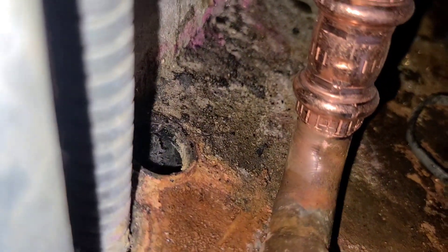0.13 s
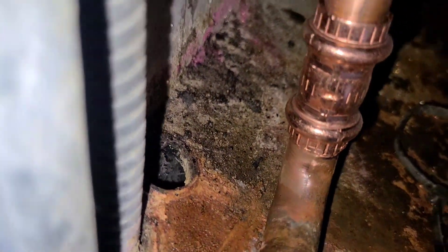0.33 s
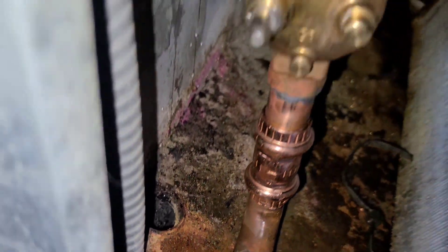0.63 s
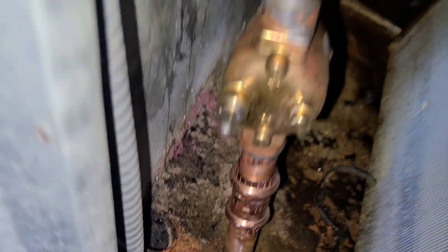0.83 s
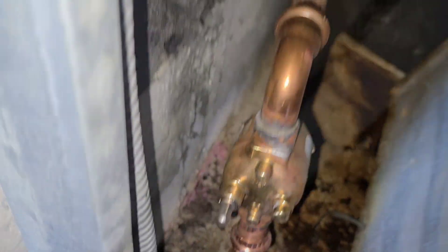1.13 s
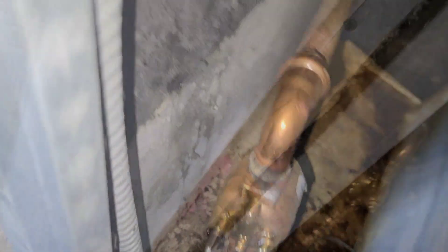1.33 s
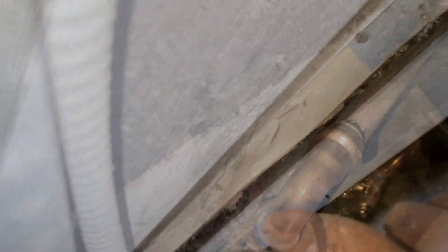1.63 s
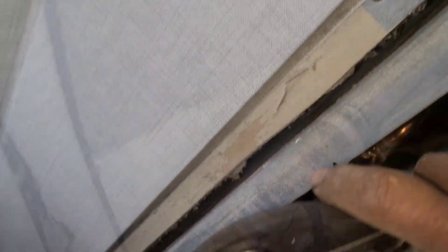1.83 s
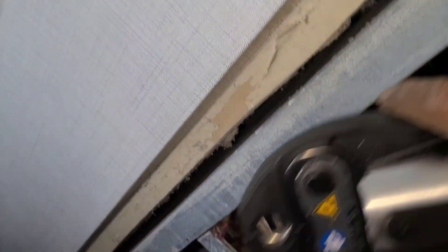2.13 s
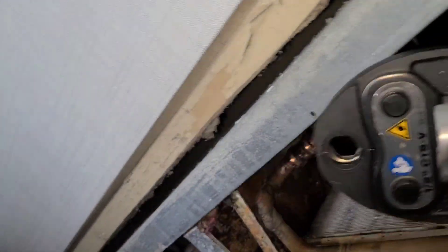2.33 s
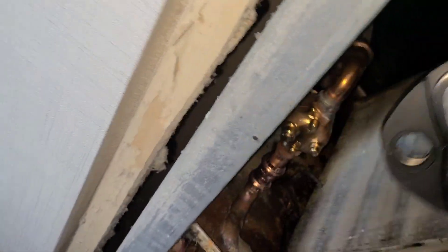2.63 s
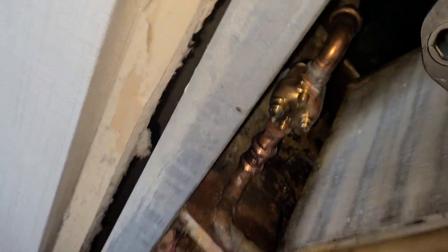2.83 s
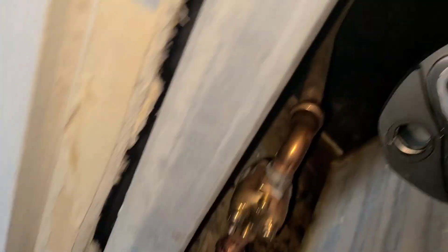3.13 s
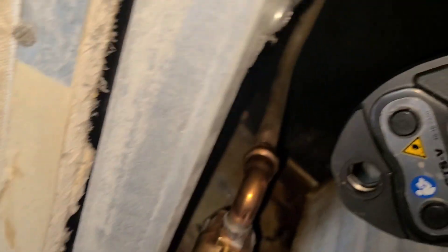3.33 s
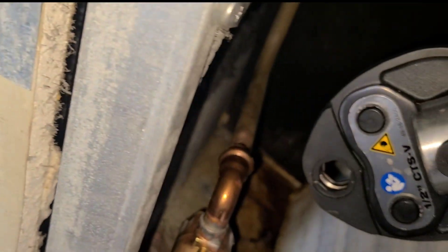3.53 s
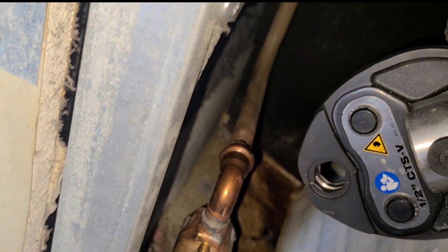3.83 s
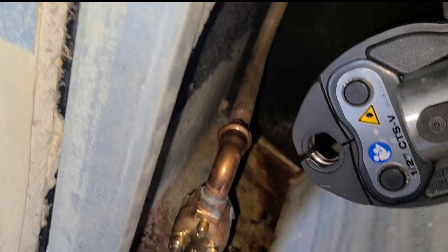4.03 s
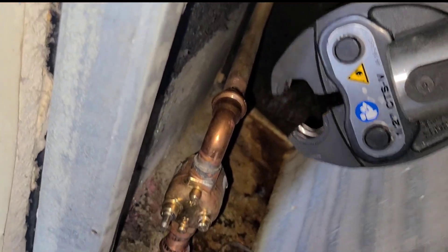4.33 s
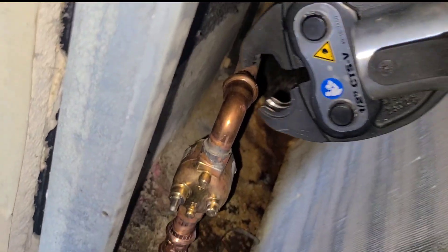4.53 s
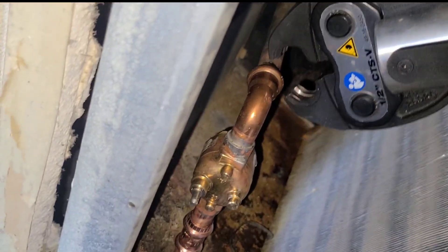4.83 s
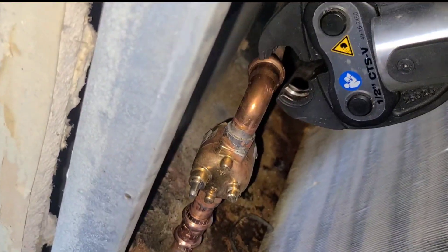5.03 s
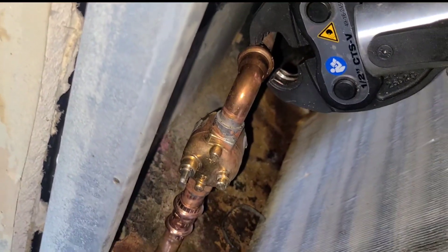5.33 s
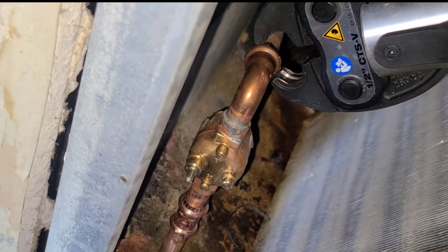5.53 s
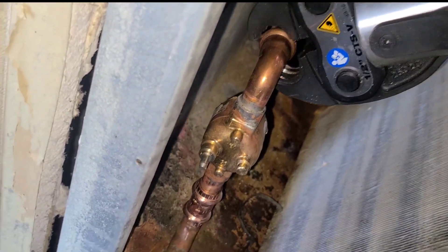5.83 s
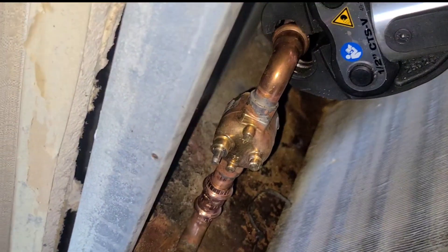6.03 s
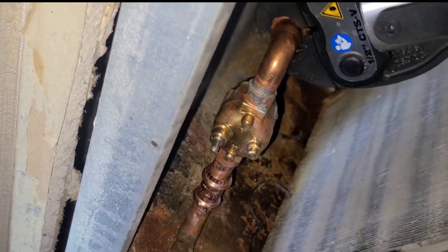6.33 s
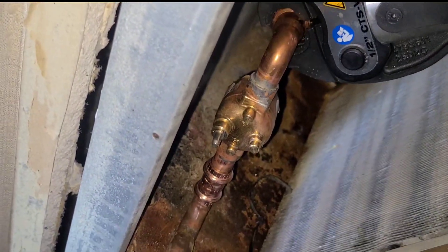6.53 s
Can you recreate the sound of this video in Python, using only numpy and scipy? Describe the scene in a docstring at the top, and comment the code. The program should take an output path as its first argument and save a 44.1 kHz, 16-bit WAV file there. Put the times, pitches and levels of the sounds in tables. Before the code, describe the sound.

Close clunks, metallic rattles and dry snaps of a heavy hand tool being manoeuvred against framing and copper pipe, with hollow thuds and quiet gaps.

```python
"""In a narrow wall cavity, in a quiet room with a low rumble, a heavy press tool is set on a copper fitting.
Its steel jaws click; it knocks on framing and pipe, scrapes along an edge and sets a hollow panel booming.
Knocks, scrapes, rumble and hiss are shaped noise; booms and clicks are dying sines; squeaks are wavering sines.
Metal resonances and early echoes colour the knocks and scrapes. Two microphones hear it all in stereo."""
import sys
import numpy as np
from scipy import signal
from scipy.fft import rfft, irfft
from scipy.io import wavfile
from scipy.ndimage import uniform_filter1d

SR = 44100
rng = np.random.default_rng(int(sys.argv[2]) if len(sys.argv) > 2 else 0)


def wav_record(signal):
    """Record a signal, one row per channel, as 16-bit PCM in the file named by sys.argv[1]."""
    frames = np.transpose(np.atleast_2d(signal))
    bounded = np.clip(frames, -1, 1)
    # unit amplitude maps onto the largest positive 16-bit level
    quanta = np.round(bounded * 32767).astype(np.int16)
    wavfile.write(sys.argv[1], SR, quanta)


N = 295470  # length of the sound in samples
HZ = np.fft.rfftfreq(N, 1 / SR)

# Table levels are relative: later filters, echoes and trims still change them.
# Steady sound of the room: (frequency [Hz], level per Hz [dB])
ROOM_SPECTRUM = [(20, -22.5), (32, -2.5), (64, 9), (95, -7.5), (170, -8.5), (230, -29), (400, -21.5),
                 (560, -28.5), (850, -35), (1250, -20.5), (1850, -37.5), (2900, -23), (5200, -35),
                 (6500, -53.5), (11500, -40), (16000, -48)]
ROOM_DB = -55.5

# Brief notes of rubbed or struck metal: (time [s], pitch [Hz], level [dB], length [s])
SQUEAKS = [(0.416, 2830, -58, 0.033), (1.854, 3510, -47, 0.085), (1.88, 440, -67, 0.85),
           (2.455, 508, -39, 0.078), (3.24, 535, -48, 0.14), (4.177, 8950, -63.5, 0.073),
           (5.621, 420, -50.5, 0.22), (6.4, 1510, -32.5, 0.023)]

# Faint swells of hiss: (start [s], length [s], level [dB])
HISS_SWELLS = [(.45, 1, -75.5), (3.527, .06, -63.5), (3.645, 0.096, -74), (3.83, 0.16, -62.5),
               (4.025, 0.37, -77.5)]
# Colour of that hiss: (frequency [Hz], level per Hz [dB])
HISS_SPECTRUM = [(1500, -7), (3500, -1), (6500, -8.5), (11000, -2), (16000, -5.5)]

# Blows. Hard contact is bright, padded contact dull; a loose part after-rings, a part held fast does not:
# (time [s], thud [dB], level [dB], brightness [dB per octave], ring time at 1 kHz [s], after-ring [dB])
KNOCKS = [(1.066, -24, -21, 3, 0.043, -18), (1.115, -30, -34.5, 5, 0.032, -11.5),
          (1.313, -67, -47.5, 4.5, 0.029, -6), (1.416, -43.5, -42.5, -3.5, 0.03, -20),
          (1.637, -63, -51.5, 3.5, 0.036, -10.5), (1.736, -50.5, -53, -7, 0.022, -27),
          (1.853, -65, -50, 2, 0.028, -3), (2.255, -59, -40.5, 1, 0.058, -14.5),
          (2.286, -15.5, -26, -0.5, 0.029, -19.5), (2.325, -22, -51.5, 4, .025, -6.5),
          (2.448, -21.5, -21.5, -2, .055, -19.5), (2.468, -12.5, -20.5, -1.1, 0.048, -22),
          (2.54, -34, -30.5, 2, .044, -11), (2.585, -23, -30, 3, 0.094, -14),
          (2.606, -23, -42.5, -9, 0.07, -20), (2.671, -27, -40, -0.5, .044, -5.5),
          (2.711, -29, -38.5, 5.5, 0.022, -1), (2.762, -23.5, -20.5, 4, 0.027, -20.5),
          (2.813, -46, -35.5, 1, 0.11, -20), (2.868, -31.5, -42.5, 3.5, 0.056, -19),
          (2.911, -63, -20, 5.5, .06, -20), (3.05, -39.5, -47, -2, 0.052, -4),
          (3.1, -63, -27, 4.5, 0.055, -20.5), (3.159, -32, -36.5, 1, 0.088, -21),
          (3.253, -50, -50.5, 5, 0.016, -6), (3.322, -45.5, -50.5, -1.5, 0.13, -12.5),
          (3.566, -57.5, -59.5, -8, .068, -17.5), (4.487, -39, -35.5, 7, 0.055, -20),
          (4.573, -24, -25, 4, 0.038, -26), (4.697, -28, -29, -2.9, 0.13, -17.5),
          (4.793, -25, -24.5, -0.6, 0.04, -15), (4.817, -34, -35, 1.5, 0.11, -28),
          (5.131, -28.5, -35, -1, 0.16, -22), (5.236, -39.5, -51, -5.5, 0.18, -11),
          (5.277, -43, -49, -6, .045, -13), (5.694, -35, -54, -6.5, 0.05, -7),
          (5.902, -35.5, -50.5, -9.5, 0.07, -10.5), (6.061, -52, -68.5, -9.5, 0.16, -11.5),
          (6.261, -41.5, -50, -7.5, 0.069, -9), (6.347, -32.5, -31, 0.5, 0.098, -7.5),
          (6.385, -25, -40.5, -4, 0.065, -3.5), (6.406, -38, -35.5, -4, 0.079, -19)]
# A blow of middling hardness: (frequency [Hz], level [dB])
BLOW_SPECTRUM = [(300, -4), (520, -5), (1000, 1), (1600, 2.5), (2600, 0.5), (4300, 3), (7000, -5.5),
                 (11000, -12), (15000, -16.5)]
PIVOT_HZ = 2500  # brightness tilts a blow around this frequency
# Resonances of steel jaws, pipe and framing: (frequency [Hz], width [Hz], level over the dense modes [dB])
METAL_MODES = [(256, 54, -1), (421.6, 60, 4.5), (706, 28, -1), (904, 26, -4), (1034, 44, -7.5),
               (1183, 37, -3.5), (1720, 32, -11.5), (1747, 9.3, -0.5), (2083, 23, -14), (2690, 22, 5),
               (3476, 310, 3), (3780, 12, -9.5), (4310, 41, -7), (5020, 160, 2.5), (5430, 70, 6.5),
               (5843, 50, -6.5), (6380, 78, -3.5), (6560, 550, -5), (6940, 25, 6.5), (7396, 51, 11.5),
               (10150, 220, -1), (11510, 230, -1.5)]
# Low notes of the hollow panel: (frequency [Hz], level [dB], time to fall 60 dB [s])
PANEL_MODES = [(45.5, -9, 0.39), (94, -11.5, 0.22), (122.6, 12, 0.053), (148.86, -2.5, 0.28),
               (173, 3, 0.12), (240.6, -7.5, 0.18), (278, -14.5, .25)]
# The pipe run swinging in its clips: (frequency [Hz], level [dB], time to fall 60 dB [s])
PIPE_MODES = [(49.5, -13, 0.39), (80.6, -1, 0.091), (104.4, 1, 0.11), (130.6, 1.5, 0.12),
              (157.5, -5.5, 0.27), (191, -7.5, 0.15), (247.5, -9, 0.25), (300.5, -21.5, 0.31)]
ON_PIPE_S = 4.25  # the tool touches the panel until then, the pipe afterwards

# Strokes of the tool along its surroundings:
# (start [s], length [s], shaking [dB], rubbing [dB], grit [dB])
SLIDES = [(1.113, 0.1, -44, -58.5, -55), (1.423, 0.12, -55.5, -66, -71), (1.585, 0.26, -62.5, -62.5, -73),
          (1.853, 0.11, -49, -56.5, -67), (2.316, .05, -47, -70, -59.5), (2.501, 0.061, -36, -50, -46),
          (2.567, 0.38, -27.5, -42, -44), (3.038, 0.078, -41, -56.5, -53.5), (3.148, .09, -35, -55, -63.5),
          (3.912, 0.058, -48.5, -67, -80), (4.294, 0.11, -56, -63.5, -63.5), (4.397, 0.11, -41, -55, -61),
          (4.484, .08, -43.5, -44.5, -52), (4.575, 0.085, -38.5, -51.5, -50.5),
          (4.689, 0.17, -31.5, -45, -56), (5.165, 0.21, -42, -57, -90), (5.644, .4, -44, -64.5, -79),
          (6.355, 0.1, -31.5, -52.5, -62), (6.63, .09, -55, -69, -62)]
SHAKING, RUBBING, GRITTING = 2, 3, 4  # columns of SLIDES
GRIP_S = 0.038  # time a stroke needs to take hold
# how fast each effect dies away once the hand stops pushing
SHAKE_FADE_DB_PER_S, RUB_FADE_DB_PER_S, GRIT_FADE_DB_PER_S = 87.5, 140, 200.5
# Dull part of a scrape: (frequency [Hz], level per Hz [dB])
RUB_SPECTRUM = [(200, -29), (300, 1), (450, 1), (700, 1), (1300, -4), (2200, -16.5), (3200, -20.5),
                (6000, -70.5)]
# Gritty part of a scrape: (frequency [Hz], level per Hz [dB])
GRIT_SPECTRUM = [(1200, -46), (2500, 3.5), (3500, 0), (5000, 1.5), (7000, -9), (8500, -5.5), (12000, -3.5),
                 (16000, -7)]

# Small dry snaps of jaw and linkage, and the sharp crack that opens some blows: # (time [s], level [dB], pitch
# factor [1], strength of the second click against the first [1])
TICKS = [(1.2133, -26.5, 1.115, 2.8), (1.4182, -42.5, 0.4, 1.1), (1.5103, -45, 0.99, 1.1),
         (1.85, -33, 0.83, 2), (2.156, -48.5, 1.19, 0.36), (2.4506, -24, .6, .8),
         (2.5854, -24.5, 0.75, 0.26), (2.981, -34, 1.3, 0.49), (4.3477, -20, 1.05, 1.9),
         (6.678, -38, 1.26, 0.12)]
# Notes inside one click, at pitch factor 1: (frequency [Hz], level [dB], time to fall 60 dB [s])
SNAP_MODES = [(1390, -11.5, 0.02), (2260, -14.5, 0.0091), (3280, 7.5, 0.01), (4280, 27, 0.0055),
              (5700, -2.5, 0.0028), (9100, -32, 0.0018)]
SNAP_AFTER_T60 = 0.03  # time for the faint answer to a snap to fall 60 dB [s]

# Left microphone over right: (frequency [Hz], level [dB])
BALANCE_DB = [(200, 1), (700, 1), (1300, 6), (2400, 5), (4400, 13.5), (7500, 12.5), (10000, 5.5),
              (15000, -0.5)]
# How alike the two microphones hear: (frequency [Hz], likeness [0-1])
SAME = [(100, 1), (300, 0.4), (600, 0.2), (1200, 0.2), (4000, 0), (14000, 0)]
EDGE_HZ = 16100  # the treble ends here


def amp(db):
    """Turns decibels into gain."""
    return 10 ** (np.asarray(db) / 20)


def unit(x):
    """Scales a signal to an average strength (rms) of 1."""
    return x / np.sqrt(np.mean(x ** 2) + 1e-20)


def read(points, hz):
    """Reads a table between its points, along a logarithmic frequency axis."""
    f, value = np.transpose(points)
    return np.interp(np.log(hz + 1), np.log(f), value)


def add(mix, s, sound):
    """Adds a sound to the mix at time s, cut off at the end of the mix."""
    part = mix[..., round(s * SR):][..., :sound.shape[-1]]
    part += sound[..., :part.shape[-1]]


def pair(two):
    """Blends two unrelated signals into left and right spectra: alike in the bass, less so above."""
    a, b = rfft(two)
    same = np.clip(read(SAME, HZ), 0, 1)
    return np.array([a, same * a + np.sqrt(1 - same ** 2) * b])


def coloured(two, spectrum):
    """Makes a stereo sound of rms 1 by filtering two signals with the given spectrum."""
    return unit(irfft(pair(two) * amp(read(spectrum, HZ)), N))


def high_pass(x, hz, order=2):
    """Weakens what lies below hz."""
    return signal.sosfilt(signal.butter(order, hz, "highpass", fs=SR, output="sos"), x)


def ring(modes, t, pitch=1):
    """Adds up sines that each die away at their own speed, as in a struck body."""
    total = 0
    for hz, db, t60 in modes:
        total = total + amp(db - 60 * t / t60) * np.sin(2 * np.pi * hz * pitch * t)
    return total


def room(swell_s=0.54, start_db=-8):
    """Filtered noise: a steady low rumble, and a faint hiss that comes up in the first moments."""
    air = amp(ROOM_DB) * coloured(rng.standard_normal((2, N)), ROOM_SPECTRUM)
    hiss = irfft(rfft(air) * HZ ** 4 / (HZ ** 4 + 250 ** 4), N)  # the part above about 250 Hz
    hiss_gain = amp(np.interp(np.arange(N) / SR, [0, swell_s], [start_db, 0]))
    return air + hiss * (hiss_gain - 1)


def squeaks(unsteady=0.04):
    """Rubbed or struck metal briefly sings: one sine whose pitch wavers at random."""
    out = np.zeros(N)
    for s, hz, db, length in SQUEAKS:
        t = np.arange(round(length * SR)) / SR
        waver = 1 + unsteady * unit(uniform_filter1d(rng.standard_normal(len(t)), 120))
        note = np.sin(2 * np.pi * np.cumsum(hz * waver) / SR)
        swell = np.sin(np.pi * t / length)
        add(out, s, amp(db) * swell * note)
    return out


def hiss_swells():
    """Each swell is a soft hiss of noise that rises and fades."""
    gain = np.zeros(N)
    for s, length, db in HISS_SWELLS:
        add(gain, s, amp(db) * np.sin(np.linspace(0, np.pi, round(length * SR))))
    return gain * coloured(rng.standard_normal((2, N)), HISS_SPECTRUM)


def blow_db(hz, level_db, brightness, reach=0.47):
    """Gives the spectrum of a blow: the hardness of the contact tilts it, the top octaves most."""
    octaves = ((hz / PIVOT_HZ) ** reach - 1) / (reach * np.log(2))
    return level_db + read(BLOW_SPECTRUM, hz) + brightness * octaves


def cavity(x, reach_s=0.008, count=9, echo=0.27):
    """The close walls return a few early echoes, which comb the sound differently at every call."""
    size = x.shape[1]
    hz = np.fft.rfftfreq(size, 1 / SR)
    taps = np.zeros(size)
    delays = (rng.uniform(0.15, 1, count) * reach_s * SR).astype(int)
    taps[delays] = echo * rng.choice([-1, 1], count)
    share = hz / (hz + 500)  # long waves bend round the studs
    combed = 1 + rfft(taps) * share
    evened = np.sqrt(1 + count * (echo * share) ** 2)  # keeps the level about the same
    return irfft(rfft(x) * combed / evened, size)


def knocks(after_t60=0.34, damping=0.32, rise_s=0.002, top_db=-3):
    """Each blow wakes a dense cloud of short modes (bands of noise) and a weaker after-ring of the cavity."""
    centres = np.geomspace(290, 15000, 12)  # band centres [Hz]
    step = np.log(centres[1] / centres[0])
    t, out = np.arange(SR // 2) / SR, np.zeros((2, N))
    white = pair(rng.standard_normal((2, N)))
    clouds = []
    for hz in centres:
        distance = np.clip(np.log((HZ + 1) / hz) / step, -1, 1)
        band = irfft(white * np.cos(np.pi / 2 * distance), N)
        clouds.append(unit(band) / np.sqrt(3))  # three bands to a register
    for s, _, db, brightness, t60, after_db in KNOCKS:
        start = rng.integers(N - len(t))  # a random piece of the noise for each blow
        blow = np.zeros((2, len(t)))
        for hz, cloud in zip(centres, clouds):
            life = (hz / 1000) ** -damping  # treble dies sooner and rises faster
            direct = amp(-60 * t / (t60 * life))
            after = amp(after_db - 60 * t / (after_t60 * life))
            fall = np.sqrt(direct ** 2 + after ** 2)
            swell = 1 - np.exp(-t / (rise_s * life))
            gain = amp(blow_db(hz, db, brightness) + top_db * (hz / EDGE_HZ) ** 2)
            blow += gain * fall * swell * cloud[:, start:start + len(t)]
        add(out, s, cavity(blow))
    return out


def metal(x):
    """Whatever is struck or scraped rings with the same resonances."""
    body = 1 + sum(amp(db) / (1 + 2j * (HZ - hz) / width) for hz, width, db in METAL_MODES)
    return irfft(rfft(x) * body, N)


def slide(column, fade_db_per_s):
    """Gain for one effect of the strokes: each takes hold, stays even, then dies away."""
    gain = np.zeros(N)
    for row in SLIDES:
        start, length = row[:2]
        t = np.arange(round((length + 1) * SR)) / SR
        grip = np.minimum(t / GRIP_S, 1)
        add(gain, start, grip * amp(row[column] - fade_db_per_s * np.maximum(t - length, 0)))
    return gain


def booming(modes, touching, thud_db, shake_db, spread_s, push_s=0.00063, late_s=0.0021, lowest_hz=38):
    """Blows and the judder of sliding drive the low modes of whatever the tool is touching."""
    t = np.arange(SR) / SR
    filling = 1 - np.exp(-t / spread_s)  # the bending wave takes a moment to spread
    push = t * np.exp(-t / push_s)
    boom = high_pass(signal.fftconvolve(ring(modes, t) * filling, push)[:SR], lowest_hz)
    boom /= np.sqrt(np.mean(boom[:SR // 25] ** 2))  # rms 1 over the first 40 ms
    thuds = np.zeros(N)
    for s, db, *_ in KNOCKS:
        if touching[round(s * SR)]:
            add(thuds, s + late_s, amp(db + thud_db) * boom)
    judder = signal.fftconvolve(rng.standard_normal(N), boom)[:N]
    judder /= np.sqrt(uniform_filter1d(judder ** 2, SR // 10))  # the hand keeps the shaking even
    return thuds + amp(shake_db) * slide(SHAKING, SHAKE_FADE_DB_PER_S) * touching * judder


def scrape(catches_per_s=400, spread_db=4.5, smooth=0.4, flutter_db=2, catch_s=0.0025, shifts_per_s=4):
    """Metal drags over a rough edge: a hail of tiny catches under an unsteady pressure."""
    caught = rng.random(N) < catches_per_s / SR
    size = amp(spread_db * np.minimum(rng.exponential(1, N), 4)) * caught
    power = signal.lfilter([1], [1, -np.exp(-1 / (catch_s * SR))], size ** 2)  # each catch buzzes briefly
    catches = (unit(np.sqrt(power)) + smooth) * rng.standard_normal((2, N))
    flutter = uniform_filter1d(uniform_filter1d(rng.standard_normal(N), 500), 300)
    pressure = amp(flutter_db * unit(flutter))
    rub = slide(RUBBING, RUB_FADE_DB_PER_S) * coloured(catches, RUB_SPECTRUM)
    grit = slide(GRITTING, GRIT_FADE_DB_PER_S) * coloured(catches, GRIT_SPECTRUM)
    sound = unit(pressure) * (rub + grit)
    place = np.sin(np.pi * shifts_per_s * np.arange(N) / SR) ** 2  # the echoes shift as the tool moves
    return cavity(sound * place) + cavity(sound * (1 - place))


def ticks(level_db=-2, second_s=0.0013, contact_s=0.00003, after_db=-16, lowest_hz=1000):
    """A small, well damped part, or the hard first contact of a blow, clicks twice in quick succession; the
    cavity answers faintly."""
    t, out = np.arange(SR // 10) / SR, np.zeros((2, N))
    answers = rng.standard_normal((len(TICKS), 2, len(t)))
    for (s, db, pitch, second_strength), answer in zip(TICKS, answers):
        first = ring(SNAP_MODES, t, pitch)
        second = ring(SNAP_MODES, np.maximum(t - second_s, 0), pitch)
        snap = first + second_strength * second
        snap = signal.lfilter([1], [1, -np.exp(-1 / (contact_s * SR))], snap)  # contact time rounds off the top
        snap = high_pass(snap, lowest_hz * pitch, order=3)  # too small to radiate bass
        snap /= np.sqrt(np.mean(snap[:SR // 170] ** 2))  # rms 1 over the first 6 ms
        answer = answer * amp(-60 * t / SNAP_AFTER_T60)
        answer /= np.linalg.norm(answer[0])
        tail = signal.fftconvolve(answer, snap[None], axes=1)[:, :len(t)]
        add(out, s, amp(db + level_db) * (snap + amp(after_db) * tail))
    return out


def scene():
    """The tool bumps past the panel, then settles on the pipe, over the quiet room."""
    on_pipe = np.arange(N) / SR > ON_PIPE_S
    panel = booming(PANEL_MODES, ~on_pipe, thud_db=-4, shake_db=-2, spread_s=0.0061)
    pipe = booming(PIPE_MODES, on_pipe, thud_db=-9.5, shake_db=0, spread_s=0.018)
    struck = metal(knocks() + scrape())
    return struck + panel + pipe + ticks() + squeaks() + hiss_swells() + room()


def record(dry, lag_s=0.000085):
    """The left microphone faces the work and hears more treble; sound reaches it a moment later."""
    left_over_right = amp(read(BALANCE_DB, HZ))
    right = np.sqrt(2 / (1 + left_over_right ** 2))
    left = right * left_over_right * np.exp(-2j * np.pi * HZ * lag_s)
    heard = irfft(rfft(dry) * np.array([left, right]), N)
    treble_limit = signal.firwin(401, EDGE_HZ, window=("kaiser", 9), fs=SR)
    return signal.oaconvolve(heard, treble_limit[None], "same")


dry = scene()
out = record(dry)
wav_record(out)
```